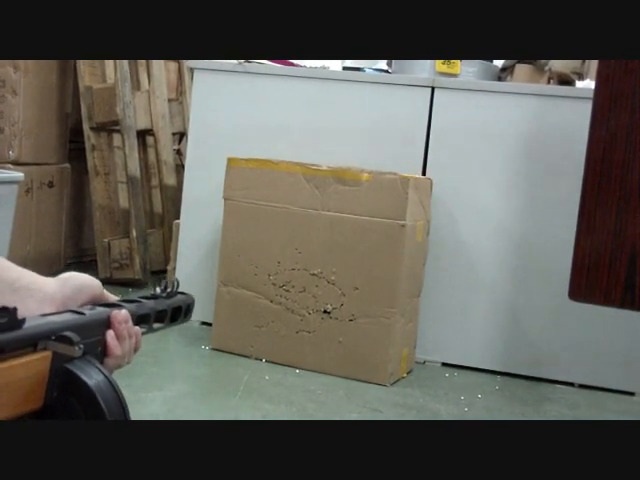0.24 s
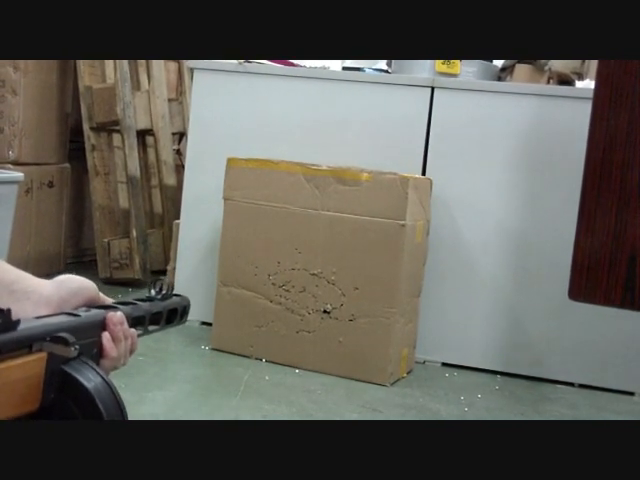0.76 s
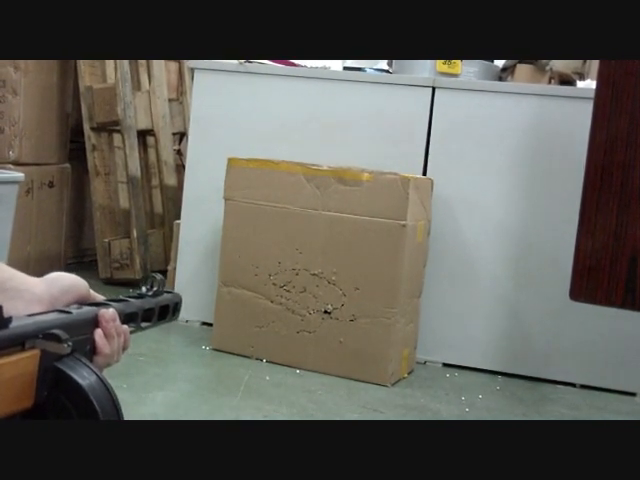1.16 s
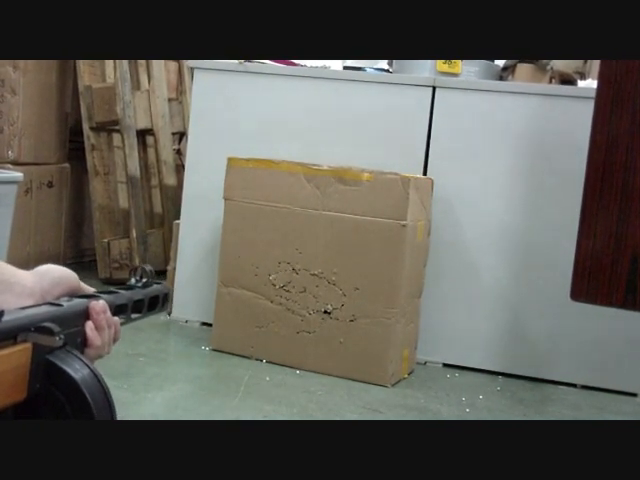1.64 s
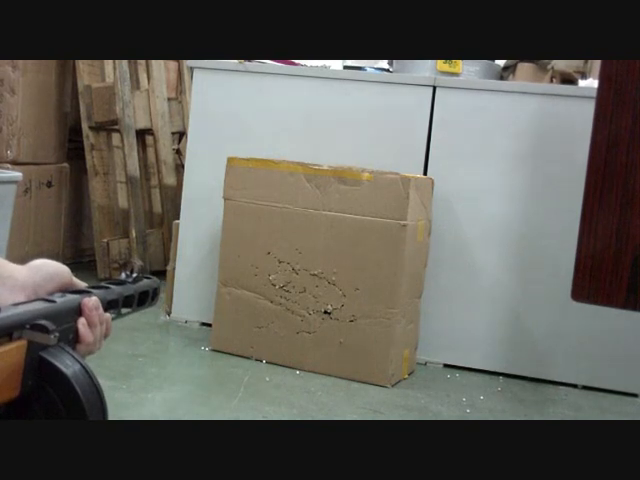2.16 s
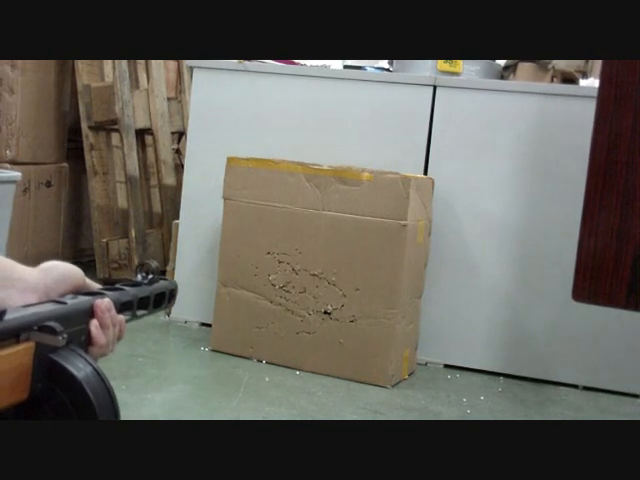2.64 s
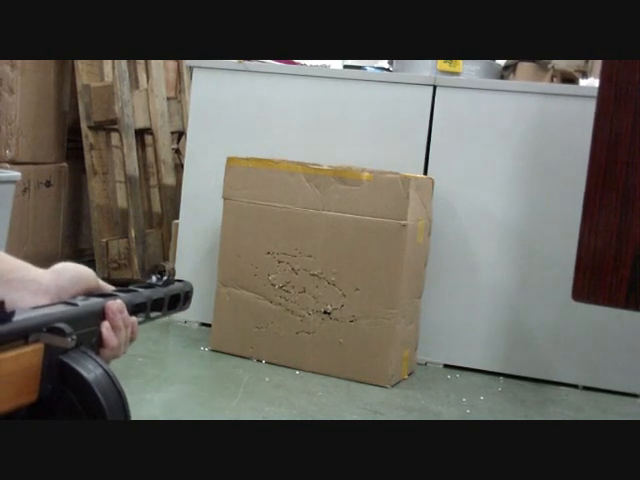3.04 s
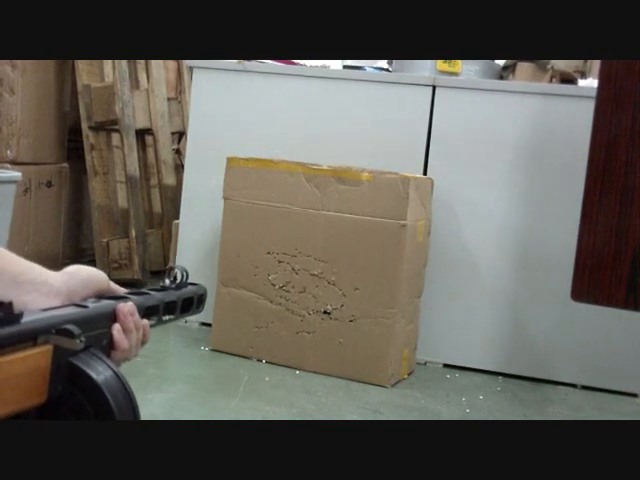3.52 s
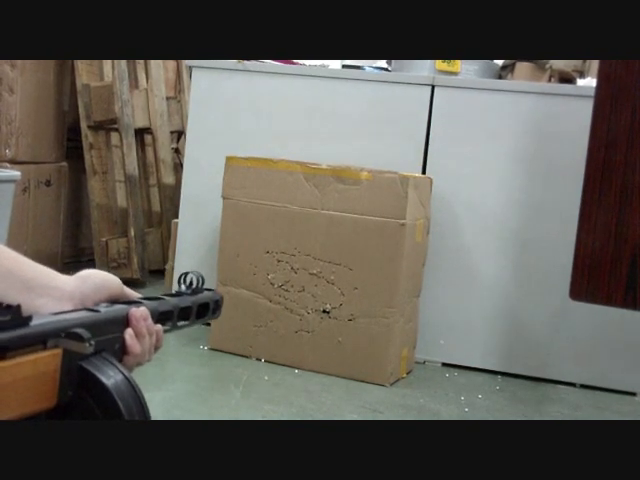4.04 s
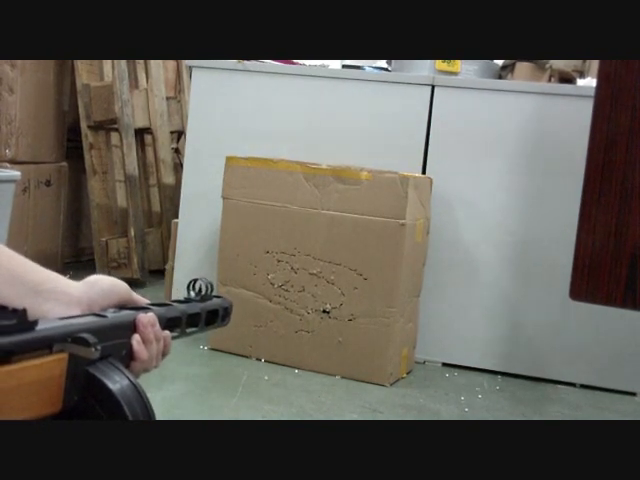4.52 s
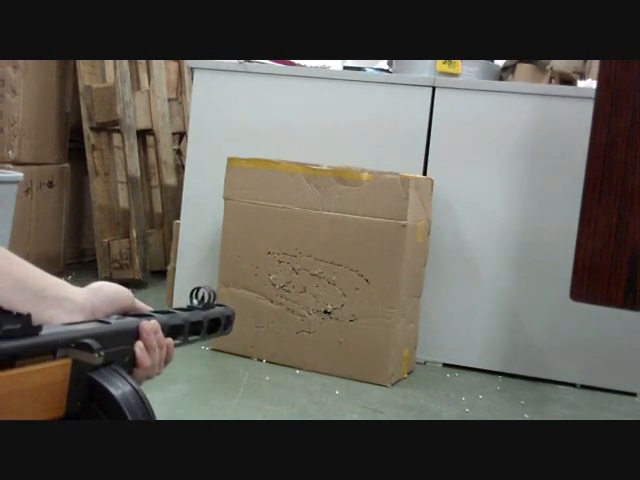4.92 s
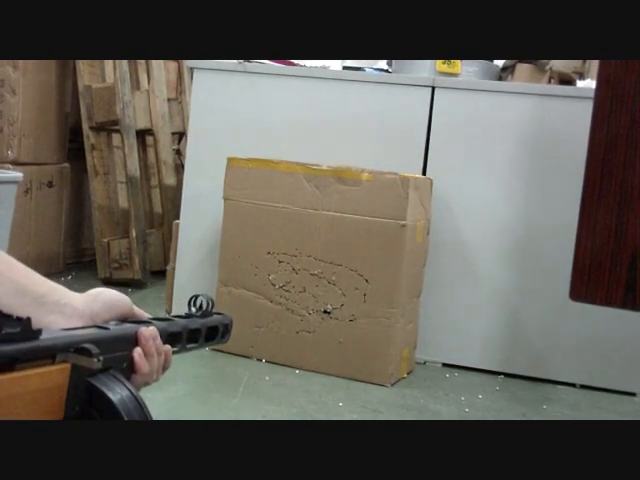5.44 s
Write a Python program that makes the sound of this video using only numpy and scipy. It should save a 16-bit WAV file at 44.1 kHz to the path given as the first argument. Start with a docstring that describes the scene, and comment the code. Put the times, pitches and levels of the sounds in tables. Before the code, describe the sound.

After a quiet second, an electric pellet gun rattles off fast, sharp clacks, its motor whirring as pellets slap a cardboard box.

```python
"""A store room, the microphone close to an electric pellet gun aimed at a cardboard box.
First a second of room hush and a few rustles. Then the motor spins up and one burst of about 17 shots
a second runs to the end. In each shot the piston pushes air out and slams home, floor and wall echo it,
the pellet slaps the box and the box booms. Loose parts rattle; motor and gears whirr underneath."""
import sys
import numpy as np
from scipy import signal
from scipy.fft import rfft, irfft, next_fast_len
from scipy.io import wavfile

SR = 44100
rng = np.random.default_rng(int(sys.argv[2]) if len(sys.argv) > 2 else 0)


def persist_wave(psi):
    """Save psi, clipped to +-1, as 16-bit WAV."""
    counts = np.round(np.clip(psi, -1, 1) * 32767).astype(np.int16)
    wavfile.write(sys.argv[1], SR, np.atleast_2d(counts).T)


N = 250047
TIME = np.arange(N) / SR

# progress of the gear train, slower at first: t/s, shots fired so far
GEAR_TURNS = [(1.1305, 0), (1.2, 1), (1.2601, 2), (1.3188, 3), (1.7259, 10), (1.9602, 14), (2.426, 22),
              (2.7772, 28), (3.7689, 45), (4.5308, 58), (5.6421, 77)]
# modes of the gun's body: f/Hz, level/dB, attack/ms, t60/ms
GUN_MODES = [(169, -9.5, 2.4, 97), (308, -4.5, 1.5, 55), (586, -3, 1.1, 21.4), (841, -1, 2.2, 29),
             (1480, -2.5, 0.5, 5.5), (2260, 7.5, 0.46, 5.2), (2999, 9, 0.52, 11.2), (3247, 6, 1.24, 16),
             (3654, 6.5, 0.89, 8.4), (5484, 8, 0.66, 6.1)]
# the piston head touches, slams home, then floor and walls answer: delay/ms, level/dB
PISTON_BLOWS = [(-1, -7.5), (0.53, -0.5), (7, -5), (29, -5), (32, -19), (39.5, -10)]
# the aim wandering over the box: t/s, pellet lag/ms, slap/dB, thud/dB, boom/dB, knock/dB
AIM_DRIFT = [(1.13, -0.39, -16.5, -17.5, -33, -23), (1.44, -0.95, -13.5, -12, -22.5, -26.5),
             (1.67, -0.99, -18, -17, -25.5, -25), (1.84, 1, -9.5, -21, -15.5, -16),
             (2.02, 0.54, -10.5, -31, -17, -12), (2.25, 0.52, -10, -21, -13.5, -10.5),
             (2.43, 0.68, -12, -25, -17.5, -15), (2.6, 0.91, -14.5, -29.5, -23.5, -18.5),
             (2.84, -0.52, -16, -17, -21.5, -19), (3.07, .1, -12.5, -13.5, -25, -22),
             (3.59, -0.36, -13.5, -33, -30, -19), (3.83, 0.55, -18, -22.5, -20, -23.5),
             (4.0, -.1, -6.5, -31.5, -25, -25.5), (4.3, -0.094, -14.5, -20.5, -18, -15),
             (4.76, -0.19, -9, -27.5, -13, -11), (5.0, -0.21, -14, -25, -19, -20),
             (5.35, -0.18, -16.5, -19.5, -13, -14), (5.64, 0.11, -22.5, -17, -11.5, -11.5)]
# pellet on the front wall, on the back wall, then the slap's echo: delay/ms, level/dB
PELLET_BLOWS = [(12.6, 0), (17, -4.5), (23.3, -8.5)]
# modes of the box's walls: f/Hz, level/dB, attack/ms, t60/ms
SLAP_MODES = [(1616, 2, 0.67, 13.3), (2434, 9.5, 0.29, 8.8), (3023, -1, 0.71, 29), (3664, 4, 0.47, 9.6),
              (4980, -2, 0.39, 10.7)]
# modes of the box's hollow, in three groups: f/Hz, level/dB, attack/ms, t60/ms
BOOM_MODES = [(151, -4.5, 2.7, 52), (175, -10, 1.4, 190), (253.3, 3.5, 2.9, 80), (318.3, 12, 2.17, 32),
              (361.7, -6, 3.3, 210)]
THUD_MODES = [(208, 4, 4.4, 69)]
KNOCK_MODES = [(580, 4, 2, 38), (745, 11, 1.46, 17.3), (881, -3.5, 0.73, 58), (1240, -2, 0.38, 15)]
# the air push and the low room modes it sets going: f/Hz, level/dB, attack/ms, t60/ms
PUSH_MODES = [(68.3, -25, 4.4, 220), (84.6, -21, 2.3, 163), (134.95, -24.5, 4.7, 308),
              (235.7, -23.5, 0.5, 120)]
# spectrum of loose parts and spent pellets: f/Hz, relative level/dB
RATTLE_SPECTRUM = [(59, -35.5), (100, -39.5), (200, -5.5), (320, -4), (500, -5.5), (860, -11), (1110, -9.5),
                   (3060, -5.5), (4450, -11.5), (5710, -14), (7300, -10), (15600, -120)]
# spectrum of motor and gears: f/Hz, relative level/dB
WHIRR_SPECTRUM = [(8, -39.5), (28, -3.5), (59, -22.5), (100, -25.5), (276, -10), (543, -0.5), (879, -9.5),
                  (1130, -14), (3120, -6.5), (3790, -7), (5920, -22), (7070, -30), (9190, -71.5),
                  (15600, -120)]
# the motor spinning up and running on: t/s, level/dB
MOTOR_LEVEL = [(1.066, -72.5), (1.073, -43), (1.088, -41.5), (1.094, -26), (1.12, -28.5), (1.2, -24),
               (5.67, -23.5)]
# decay of the store room: f/Hz, t60/s
ROOM_DECAY = [(100, 0.21), (1000, 0.23), (6000, 0.32)]
# spectrum of the room tone: f/Hz, relative level/dB
HUSH_SPECTRUM = [(12, -32.5), (20, 7), (139, -6), (195, -11.5), (232, -11), (534, -17), (682, -21.5),
                 (2010, -26.5), (2440, -28), (5750, -40.5), (7000, -56.5), (9100, -98), (15400, -120)]
# the room's rumble coming and going: t/s, level/dB
RUMBLE_LEVEL = [(0.0, -52.5), (0.062, -62), (0.138, -45.5), (0.194, -63), (0.218, -55.5), (0.33, -50.5),
                (0.528, -56), (0.666, -51.5), (0.696, -58.5), (0.778, -55.5), (0.938, -51.5), (1.06, -53.5)]
# hands on the gun and two faint hums: t/s, level/dB, length/ms, centre f/Hz, width/Hz
SMALL_SOUNDS = [(.005, -63, 30, 1000, 2500), (.115, -57, 43, 800, 2000), (.248, -57, 12, 546, 400),
                (.316, -60, 12, 750, 700), (.612, -59, 46, 900, 2400), (.87, -67, 70, 1370, 40),
                (.5, -74, 1700, 697, 90.6), (1.047, -60, 6, 200, 201)]


def piston_slam():
    """Close to the microphone the piston head strikes the cylinder; the first shot cracks harder."""
    first_shot = shot_times() == GEAR_TURNS[0][0]
    level_db = -12.5 + chance_db(1.2) + 2.5 * first_shot
    return rings(GUN_MODES, PISTON_BLOWS, level_db, scatter_db=2.0, jitter_ms=0.034, detune=0.012)


def cardboard_box():
    """Down range each pellet lands somewhere new: the walls slap, then the hollow rings."""
    times, *columns = np.transpose(AIM_DRIFT)
    lag, slap_db, thud_db, boom_db, knock_db = [np.interp(shot_times(), times, c) for c in columns]
    back_wall = [(16.8, 0.0046)]  # delay/ms, level/dB
    hollow_db = chance_db(1.8)  # boom and knock vary together
    slap = rings(SLAP_MODES, PELLET_BLOWS, slap_db + chance_db(2.2),
                 scatter_db=0.5, jitter_ms=0.2827, detune=0.049, lag_ms=lag)
    thud = rings(THUD_MODES, back_wall, thud_db + chance_db(1.8),
                 scatter_db=1.0, jitter_ms=0.42, detune=0.13, lag_ms=lag)
    boom = rings(BOOM_MODES, back_wall, boom_db + hollow_db,
                 scatter_db=1.2, jitter_ms=0.08, detune=0.01, lag_ms=lag, seconds=0.2)
    knock = rings(KNOCK_MODES, back_wall, knock_db + hollow_db,
                  scatter_db=0.5, jitter_ms=0.048, detune=0.043, lag_ms=lag)
    return slap, thud + boom + knock


def air_push():
    """The spring is the same every time, so the air push just ahead of the slam barely varies."""
    blows = [(-6.49, -0.4)]  # delay/ms, level/dB
    return rings(PUSH_MODES, blows, level_db=0, scatter_db=1.5, jitter_ms=0.06, detune=0.004,
                 seconds=0.25)


def rattle():
    """Loose parts and spent pellets shake at the slam, as the pellet lands and as the wall answers."""
    level = amp(-14 + chance_db(0.6))

    def shake(ms):
        slam = amp(-4) * swell(ms + 1.2, attack_ms=3.0, t60_ms=159)
        landing = amp(-0.5) * swell(ms - 12.5, attack_ms=3.9, t60_ms=136.6)
        wall = amp(-9) * swell(ms - 28, attack_ms=1.2, t60_ms=277)
        return level * (slam + landing + wall)
    return per_shot(shake, seconds=0.25) * noise(RATTLE_SPECTRUM)


def motor():
    """The motor spins up while it first draws the spring back, then whirrs on."""
    running = TIME > MOTOR_LEVEL[0][0]
    return fader(MOTOR_LEVEL) * noise(WHIRR_SPECTRUM) * running


def store_room(x):
    """A short, diffuse reverb follows the shots, drawn afresh every 1/8 s so no pitch stands out."""
    total = np.zeros(N + SR)
    step, predelay = SR // 8, 200  # samples
    for start in range(SR, N, step):
        hz, t, spectra = signal.stft(rng.standard_normal(SR // 3), SR, nperseg=256)
        decay = amp(-60 * t / along(ROOM_DECAY, hz)[:, None])
        tail = signal.istft(spectra * decay, SR, nperseg=256)[1]
        reverb = signal.fftconvolve(x[start:start + step], tail / np.linalg.norm(tail))
        total[start + predelay:][:len(reverb)] += reverb
    return total[:N]


def room_tone():
    """Low rumble around the microphone over a steady faint hiss, with hand rustles and two hums."""
    air = noise(HUSH_SPECTRUM)
    rumble = filtered(air, lambda hz: 1 / (1 + (hz / 150) ** 4))
    total = fader(RUMBLE_LEVEL) * unit(rumble) + amp(-56.5) * (air - rumble)
    for at, db, length_ms, centre_hz, width_hz in SMALL_SOUNDS:
        white = rng.standard_normal(N)
        band = filtered(white, lambda hz: 1 / (1 + ((hz - centre_hz) / width_hz * 2) ** 2))
        envelope = np.exp(-((TIME - at) * 2000 / length_ms) ** 2)
        total += amp(db) * unit(band) * envelope
    return total


def shot_times():
    """A shot falls each time the gear train completes a turn: t/s, one row a shot."""
    times, count = np.transpose(GEAR_TURNS)
    return np.interp(np.arange(count[-1] + 1), count, times)[:, None]


def chance_db(spread_db):
    """A random level offset for each shot."""
    return spread_db * rng.standard_normal(shot_times().shape)


def rings(modes, blows, level_db, scatter_db, jitter_ms, detune, lag_ms=0, seconds=0.1):
    """Every blow of every shot sets the modes ringing, a little different each time."""
    def shape(ms):
        total = 0
        for delay_ms, blow_db in blows:
            for hz, db, attack_ms, t60_ms in modes:
                timing, tuning, strength = np.hsplit(rng.standard_normal((len(ms), 3)), 3)
                since_ms = ms - delay_ms - lag_ms - jitter_ms * timing
                tone = np.sin(2 * np.pi * hz * (1 + detune * tuning) * since_ms / 1000)
                gain = amp(db + blow_db + level_db + scatter_db * strength)
                total = total + gain * swell(since_ms, attack_ms, t60_ms) * tone
        return total
    return per_shot(shape, seconds)


def per_shot(shape, seconds):
    """Sums shape(ms since the shot), one row a shot, into the time line."""
    at = shot_times() * SR
    index = at.astype(int) + np.arange(-SR // 80, int(seconds * SR))
    since_ms = (index - at) * 1000 / SR
    return np.bincount(index.ravel(), shape(since_ms).ravel())[:N]


def swell(ms, attack_ms, t60_ms):
    """Soft start, then exponential decay."""
    ms = np.maximum(ms, 0)
    return (1 - np.exp(-ms / attack_ms)) * amp(-60 * ms / t60_ms)


def noise(spectrum):
    """Coloured noise of rms 1."""
    return unit(filtered(rng.standard_normal(N), lambda hz: amp(along(spectrum, hz))))


def filtered(x, response):
    """x shaped by a gain that depends on frequency."""
    size = next_fast_len(N + 8192)
    return irfft(rfft(x, size) * response(np.fft.rfftfreq(size, 1 / SR)), size)[..., :N]


def along(points, hz):
    """Reads (f/Hz, value) points on a log frequency axis."""
    freqs, values = np.transpose(points)
    return np.interp(np.log(hz + 1), np.log(freqs + 1), values)


def fader(points):
    """Gain over time through (t/s, level/dB) points."""
    return amp(np.interp(TIME, *np.transpose(points)))


def amp(db):
    return 10 ** (np.asarray(db) / 20)


def unit(x):
    return x / np.sqrt(np.mean(x ** 2) + 1e-20)


def scene():
    """One microphone beside the gun: direct sound in front, the store room behind it."""
    slap, hollow = cardboard_box()
    bright = piston_slam() + slap
    direct = air_push() + bright + hollow + rattle()
    reverb = store_room(amp(-3.5) * bright + amp(-9) * hollow)
    return (direct + reverb + motor() + room_tone())[None]


def record(dry):
    """This close, peaks overload the microphone input; the treble steps down, then cuts off."""
    ceiling, shelf_hz, top_hz = 0.92, 6150, 7224
    squeezed = dry / (1 + np.abs(dry / ceiling) ** 6) ** (1 / 6)
    shelf = lambda hz: 1 / (1 + (hz / shelf_hz) ** 40) + amp(-14)
    band_limit = lambda hz: np.clip((top_hz - hz) / 150 + 0.5, 0, 1) ** 2 * (hz > 4)
    return filtered(squeezed, lambda hz: shelf(hz) * band_limit(hz))


dry = scene()
out = record(dry)
persist_wave(out)
```